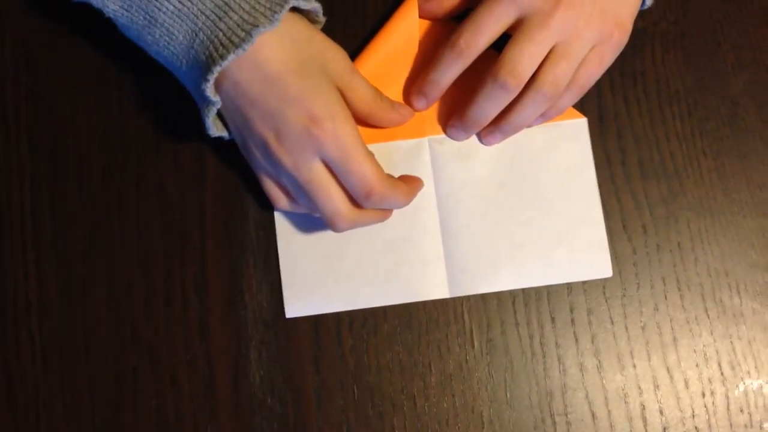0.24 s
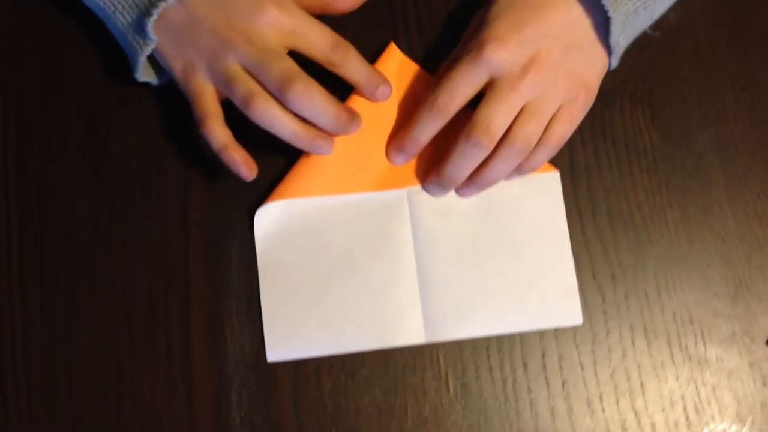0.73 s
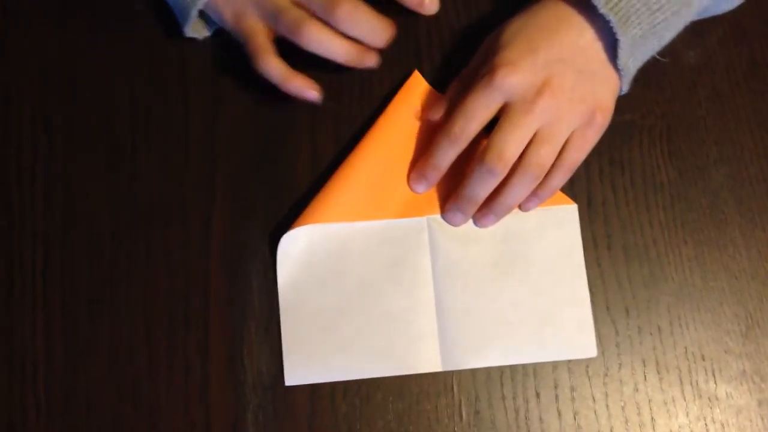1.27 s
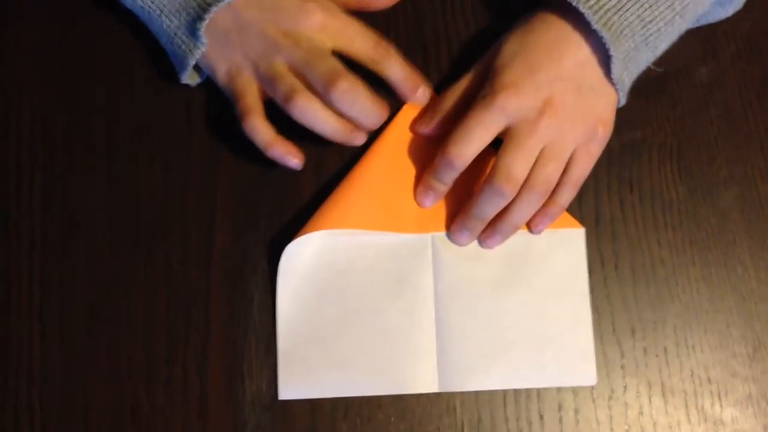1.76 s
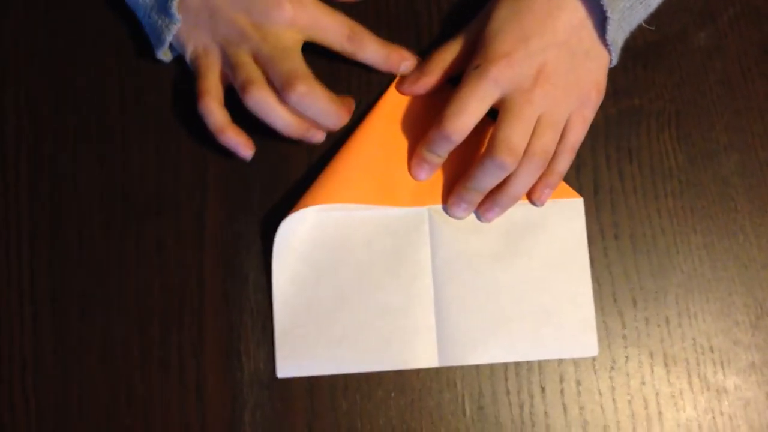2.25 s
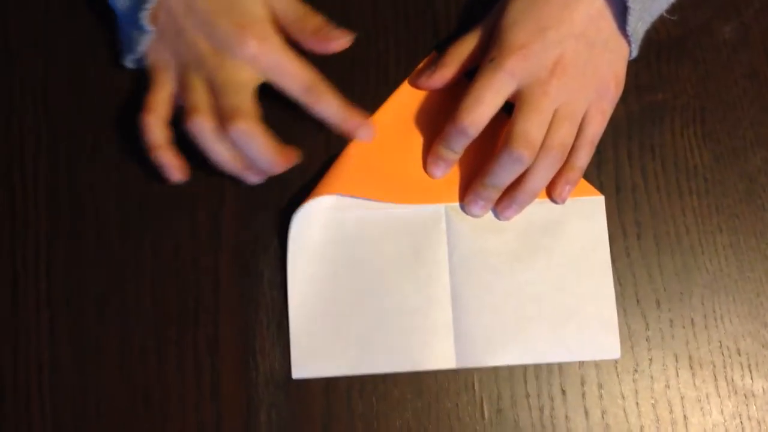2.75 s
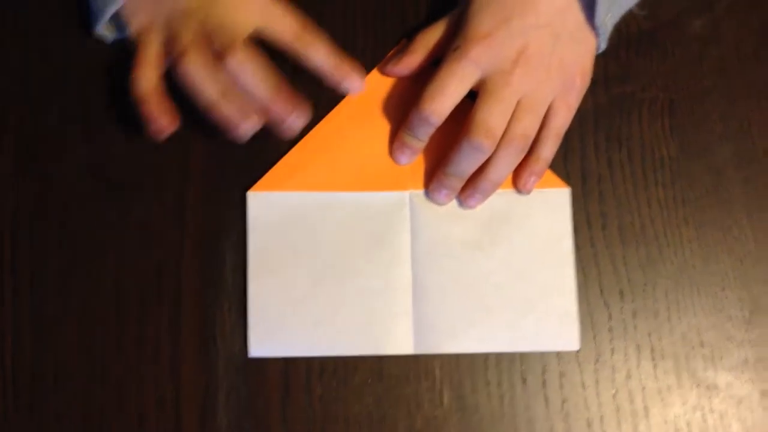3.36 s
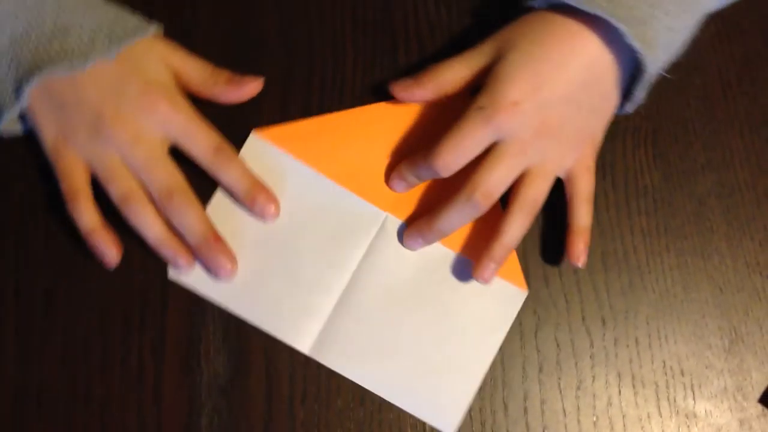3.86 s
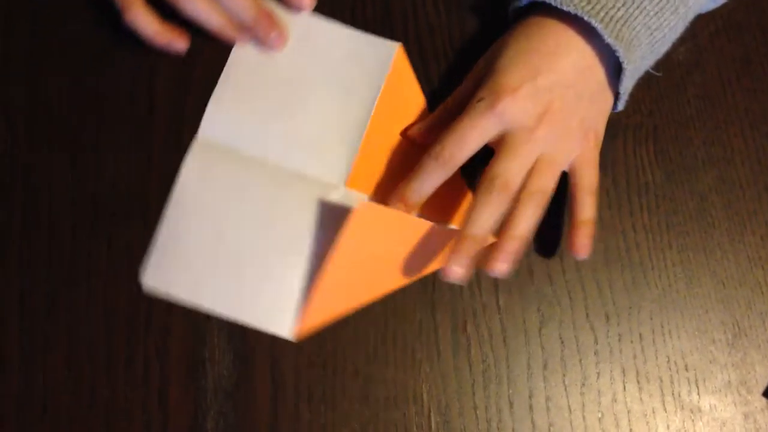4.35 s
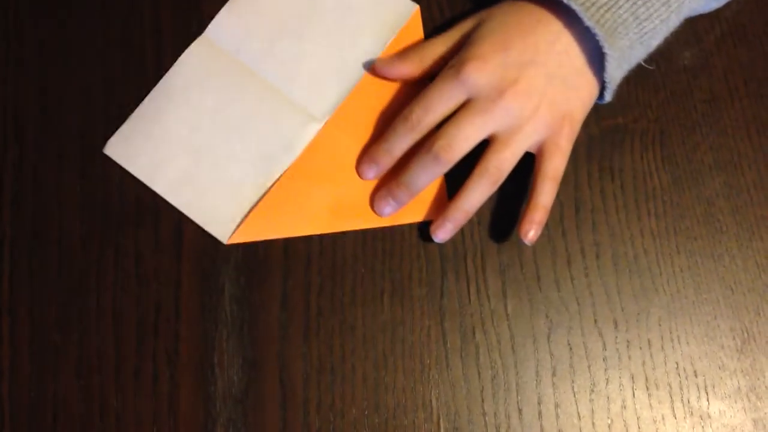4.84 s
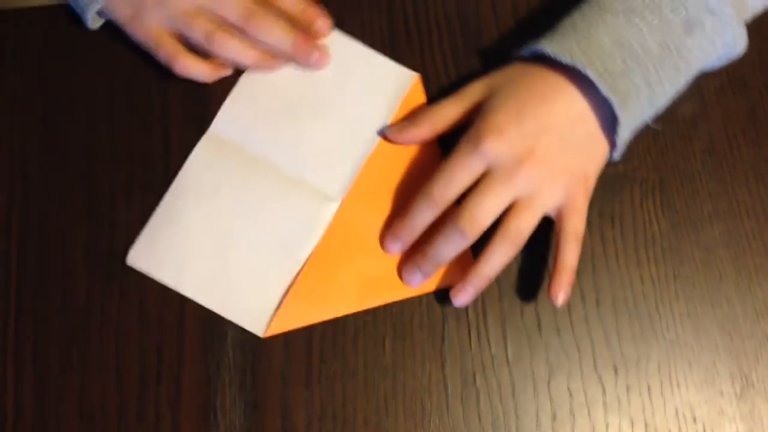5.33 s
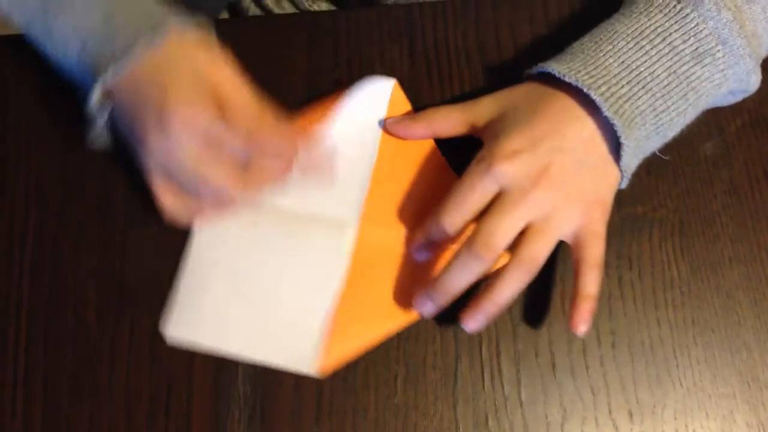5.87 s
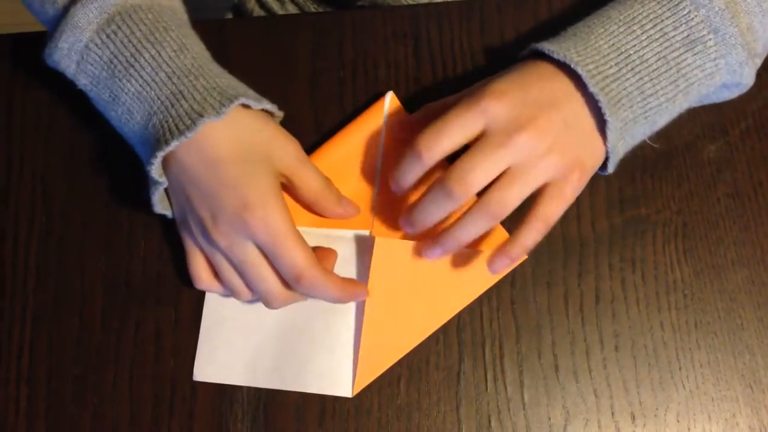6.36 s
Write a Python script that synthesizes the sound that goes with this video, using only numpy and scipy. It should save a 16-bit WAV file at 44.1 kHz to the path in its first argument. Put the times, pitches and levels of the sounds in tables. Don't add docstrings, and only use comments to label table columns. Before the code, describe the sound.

A quiet room with faint low hum and thin steady hiss; a sheet of paper is worked by hand on a wooden table, close to a small microphone. The first second holds only tiny ticks and barely audible rubbing. From 1.0 s small crackles gather into very sharp, bright snaps at about 1.16 and 1.23 s, with a short rustle. A dry click falls at 1.5 s, then near quiet. At 2.6-2.8 s a few crisp creases and a brief airy finger stroke, with a fainter one near 3.1 s. Around 3.9 s a hand lands softly with a dull low thump. From 4.0 to 4.7 s the sheet slides and buckles in the fullest rustle, dense with pops and hard cracks near 4.27 s. It calms; light touches at 5.4 s, a soft slide at 5.5 s, a moderate crinkle at 5.75-5.95 s, and faint taps from 6.2 to 6.55 s.

```python
import sys
import numpy as np
from scipy import signal
from scipy.fft import rfft, irfft, next_fast_len
from scipy.io import wavfile
from scipy.ndimage import uniform_filter1d, map_coordinates

SR = 44100
rng = np.random.default_rng(int(sys.argv[2]) if len(sys.argv) > 2 else 0)


def file_out(sig):
    cols = np.atleast_2d(sig).T
    lim = np.clip(cols, -1, 1)
    pcm = np.round(lim * 32767).astype(np.int16)
    wavfile.write(sys.argv[1], SR, pcm)


def ratio_of_db(decibels):
    return 10 ** (np.asarray(decibels, float) / 20)


N = 291060


def unit(x):
    return x / np.sqrt(np.mean(x ** 2) + 1e-20)


def along(points, hz):
    f, v = np.transpose(points)
    return np.interp(np.log(hz + 1), np.log(f + 1), v)


def wobble(rate):
    knots = rng.standard_normal(int(N * rate / SR) + 4)
    return map_coordinates(knots, [np.arange(N) * rate / SR])


def filtered(x, response):
    n = x.shape[-1]
    m = next_fast_len(n + 4096)
    spectrum = rfft(x, m) * response(np.fft.rfftfreq(m, 1 / SR))
    return irfft(spectrum, m)[..., :n]


def peak(f, hz, width_hz):
    return 1j * f * width_hz / (hz * hz - f * f + 1j * f * width_hz)


def body(modes):
    if len(modes) == 1:
        return lambda f: peak(f, *modes[0][:2]) ** 2
    return lambda f: np.sqrt(sum(ratio_of_db(2 * db) * np.abs(peak(f, hz, w)) ** 4 for hz, w, db in modes))


def patchy(depth_db):
    z = signal.stft(rng.standard_normal(N), nperseg=256)[2]
    field = uniform_filter1d(rng.standard_normal(z.shape), size=4, axis=0)
    field = uniform_filter1d(field, size=10, axis=1)
    return signal.istft(z * ratio_of_db(depth_db * unit(field)), nperseg=256)[1][:N]


# pitch_hz, level_db (per Hz)
HUM = [(15, -60), (25, -27), (57, -9), (100, -7), (145, -4), (210, -9), (260, -13.5)]
# pitch_hz, level_db (per Hz)
AIR = [(450, -15), (740, -20), (2300, -27), (2900, -21), (4500, -24.5), (15300, -24.5)]


def room_tone():
    tone = unit(filtered(patchy(depth_db=0.17), lambda hz: ratio_of_db(along(HUM + AIR, hz))))
    hum = filtered(tone, lambda hz: 1 / (1 + (hz / 500) ** 4))
    hiss = tone - hum
    return ratio_of_db(-65.5) * (hiss + hum * ratio_of_db(0.7 * wobble(6)))


# peak_s, rise_s, fall_s, level_db, centre_hz
STROKES = [(0.55, 0.34, 0.091, -66.5, 6500), (1.22, .06, .1, -51, 11000), (1.95, 0.91, 0.83, -74.5, 8000),
           (2.27, 0.39, 0.6, -75, 2200), (2.49, 0.13, 0.067, -57.5, 8000), (2.67, .07, 0.056, -51.5, 9500),
           (2.8, .03, 0.31, -54, 6900), (2.99, 0.23, 0.12, -55, 10300), (3.13, 0.15, 0.17, -59, 3500),
           (3.6, 0.59, 0.79, -63, 4300), (4.12, 0.35, .2, -56, 11000), (4.29, 0.11, .11, -41, 6800),
           (5.15, 0.053, 0.32, -57.5, 9800), (5.42, 0.023, 0.34, -59, 8000),
           (5.596, 0.12, 0.062, -54.5, 8000), (5.73, .07, .12, -60, 6500), (5.83, 0.14, 0.052, -46.5, 5340),
           (5.9, 0.11, 0.12, -51.5, 3650), (6.2, 1, 0.87, -65, 6200), (6.33, 0.064, 0.079, -63, 2600)]
# peak_s, rise_s, fall_s, level_db, centre_hz
SLIDES = [(0.76, .06, .04, -64, 4800), (0.93, .06, .14, -70, 5600), (1.03, .06, .05, -67, 7000),
          (1.1, .03, .08, -65, 4400), (1.17, .03, 0.17, -61, 5500), (1.26, .07, 0.08, -45.5, 5340),
          (1.5, 0.21, 0.17, -61.5, 3900), (1.69, 0.076, 0.14, -64, 2950), (2.83, .09, 0.055, -47.5, 3900),
          (2.92, 0.17, .2, -62, 5800), (3.82, 0.29, 0.16, -55.5, 6600), (4.0, .14, 0.48, -51, 7300),
          (4.101, .04, 0.16, -46.5, 4900), (4.189, 0.044, .15, -46, 2600), (4.44, 0.1, 0.16, -40, 5060),
          (4.61, 0.13, 0.045, -41, 4700), (4.684, 0.037, 0.13, -51, 6000), (4.81, 0.51, 0.063, -55, 6450),
          (4.9, 0.6, 0.16, -64, 7040), (5.15, .035, 0.22, -60.5, 7000), (5.24, 0.16, 0.13, -53.5, 6900),
          (5.54, 0.14, 0.11, -44, 7300), (5.92, 0.19, 0.18, -46, 3860), (6.55, 0.13, 0.039, -61, 3300)]
GROUP_HZ = [1705, 4400, 7300, 11900]
GROUP_DB = [5.6, 0.055, 0.083, .1]
REST_DB = [-83, -83, -102, -86]


def drive(group):
    s, rise, fall, db, hz = np.transpose(SLIDES + STROKES)[..., None]
    octave_loss_db = np.repeat([11.5, 3], [len(SLIDES), len(STROKES)])[:, None]
    span_db, bend = 25, 1.07
    t = np.arange(0, N / SR, 0.002)
    away = np.abs(t - s) / np.where(t < s, rise, fall)
    off_centre_db = octave_loss_db * np.log2(GROUP_HZ[group] / hz) ** 2
    level_db = db + GROUP_DB[group] - off_centre_db - span_db * away ** bend
    power = ratio_of_db(2 * REST_DB[group]) + ratio_of_db(2 * level_db).sum(axis=0)
    return np.interp(np.arange(N) / SR, t, np.sqrt(power))


# pitch_hz, width_hz, level_db
FLEX = [(1180, 5400, -18), (1690, 1300, -1), (2240, 2700, -0.5)]
# pitch_hz, width_hz, level_db
SHEET = [(3400, 1440, -5), (4400, 2200, 2), (5400, 1740, -4.5)]
# pitch_hz, width_hz, level_db
FIBRE = [(6500, 4700, 2.8), (8000, 3040, 4.5)]
# pitch_hz, width_hz, level_db
HISS = [(10900, 7200, 0.92), (12600, 3800, -9.5)]


def rubbing():
    slips = ratio_of_db(1.24 * wobble(700) + 0.53 * wobble(120) + 1.26 * wobble(30))
    out = np.zeros(N)
    for group, modes in enumerate((FLEX, SHEET, FIBRE, HISS)):
        grains = slips * patchy(depth_db=1.8)
        out += drive(group) * unit(filtered(grains, body(modes)))
    return out


# pitch_hz, t60_s
WALLS = [(300, 0.86), (3000, 0.18), (12000, 0.026)]


def walls(x):
    hz, t, z = signal.stft(rng.standard_normal(SR // 2), SR, nperseg=256)
    fall = ratio_of_db(-60 * t / along(WALLS, hz)[:, None])
    tail = signal.istft(z * fall, SR, nperseg=256)[1]
    return signal.fftconvolve(np.pad(x, (200, 0)), tail / np.linalg.norm(tail))[:N]


# pitch_hz, width_hz, level_db
CRACK = [(3200, 1600, 6), (5400, 2000, 3), (8630, 5800, 3), (13020, 5000, -5)]


def snaps(buckles):
    out, t = np.zeros(N + SR), np.arange(SR // 20) / SR
    for s, db, hz, flex_db, crack_db, ms in buckles:
        fall = ratio_of_db(-9 * t / (0.00062 * np.clip(ms, 0.2, 6))) + 0.082 * ratio_of_db(-60 * t / 0.032)
        rise = 1 - np.exp(-t / (0.00008 * (1 + ms)))
        jolt = np.sign(rng.standard_normal((3, len(t)))) * fall * rise
        jolt = np.roll(jolt, SR // 500, axis=1)
        tone = unit(filtered(jolt[0], body([(hz, 0.36 * hz, 0)])))
        crack = unit(filtered(jolt[1], lambda f: body(CRACK)(f) * f ** 2 / (f ** 2 + 1800 ** 2)))
        flex = unit(filtered(jolt[2], body([(1647, 1230, 0)])))
        snap = tone + ratio_of_db(crack_db) * crack + ratio_of_db(flex_db) * flex
        out[round((s - 0.0023) * SR):][:len(t)] += ratio_of_db(db) * snap / np.abs(snap).max()
    return out[:N]


# start_s, peak_db, flex_db (re tone), length_ms
CREASES = [(0.515, -50.5, -4, 6), (0.6512, -50.5, 1, 2.1), (0.9038, -56, -17, 4), (1.0132, -38, -27, 0.9),
           (1.035, -35.5, -18, 2.1), (1.2236, -23.5, -3, 2.5), (1.2277, -12.5, -30, 1),
           (1.49, -30.5, -6, 0.35), (1.86, -42, 2, 0.32), (1.925, -48, 5, 0.4), (2.337, -42.5, 12, 2.2),
           (2.6172, -24, -0.5, 0.38), (2.6755, -18.5, -5.5, 0.26), (2.77, -22, -8.5, 0.93),
           (2.773, -43, 15, 2.4), (2.789, -30, -2, 1.8), (3.0924, -32, -13, 2.7), (3.9147, -38, 2, 0.37),
           (4.052, -34, -5, 0.75), (4.2566, -11, 6, 0.96), (4.6212, -31, 4, 2.8), (5.8763, -31.5, 5, 0.96),
           (5.9048, -38, -3, 0.65), (6.186, -47.5, -3, 5.8)]


def creases():
    return snaps([(s, db, 3300, flex_db, 8, ms) for s, db, flex_db, ms in CREASES])


# start_s, peak_db, pitch_hz, length_ms
POPS = [(0.547, -38, 3110, 3.3), (0.7371, -42, 3080, 0.57), (1.6382, -52, 5200, 1), (3.662, -45, 6400, 2.4),
        (3.8869, -38.5, 3500, 0.41), (4.092, -27, 4550, 2.7), (4.1736, -22, 3870, 0.48),
        (4.1823, -24, 4140, 0.3), (4.251, -25.5, 4450, 4.7), (4.3021, -23.5, 3050, 6),
        (4.511, -28.5, 3030, 4.4), (5.7605, -37, 4300, 2.2), (6.3084, -32.5, 3030, 1),
        (6.3355, -41, 3820, 0.6), (6.5283, -29.5, 4600, 3.3)]


def pops():
    return snaps([(s, db, hz, -5, -9.5, ms) for s, db, hz, ms in POPS])


# start_s, level_db, centre_hz, t60_s
RUSTLES = [(0.736, -58, 5000, 0.23), (0.903, -64, 5000, 0.1), (1.011, -69, 6900, 0.34),
           (1.032, -44, 4240, 0.095), (1.087, -42.5, 4670, 0.049), (1.129, -56, 7000, 0.28),
           (1.158, -44.5, 4700, 0.3), (1.2206, -31, 4500, 0.036), (1.2311, -38.5, 6500, 0.22),
           (1.48, -61.5, 7500, 0.4), (1.499, -60, 3550, 0.11), (1.669, -61, 3080, 0.1),
           (1.86, -62.5, 4620, 0.33), (2.615, -52, 5300, 0.27), (2.674, -59, 5060, 0.24),
           (2.702, -47, 3460, 0.12), (2.769, -51, 5170, 0.3), (3.09, -72, 4140, 0.67),
           (4.168, -35, 3400, 0.33), (4.256, -31, 3700, 0.44), (4.291, -27, 3940, 0.06),
           (4.367, -35, 5540, 0.18), (4.607, -35, 5560, 0.072), (5.396, -61, 6900, 0.3),
           (5.8, -40.5, 5400, 0.5), (5.828, -34, 5000, 0.11), (5.863, -34, 4170, 0.1),
           (5.903, -44, 3800, 0.24), (6.302, -54, 4030, 0.37), (6.527, -53, 4300, 0.15)]


def rustles():
    out, t = np.zeros(N + SR), np.arange(SR // 3) / SR
    for s, db, hz, t60 in RUSTLES:
        noise, grit = rng.standard_normal((2, len(t)))
        lumps = ratio_of_db(3.2 * unit(uniform_filter1d(grit, size=60)))
        crackle = unit(filtered(noise * lumps, lambda f: peak(f, hz, 0.66 * hz) * body(CRACK)(f)))
        swell = ratio_of_db(db - 60 * t / np.clip(t60, 0.02, 0.6)) * (1 - np.exp(-t / 0.0046))
        out[round(s * SR):][:len(t)] += swell * crackle
    return out[:N]


# start_s, peak_db, pitch_hz, length_ms
TICKS = [(0.9272, -51, 4800, 5.1), (0.9842, -50, 4160, 3.6), (1.023, -36, 4050, 1.2),
         (1.029, -36.5, 9000, 1.1), (1.0386, -38, 4180, 0.5), (1.088, -33, 3200, 0.39),
         (1.1, -42, 3800, 1.2), (1.13, -43, 3500, 4.4), (1.1577, -13, 4180, 0.46),
         (1.229, -8.5, 7270, 0.32), (1.231, -21, 4400, 0.9), (1.4606, -47, 3400, 0.94),
         (1.48, -35.5, 3740, 2.1), (1.4993, -25.5, 3590, 1.8), (2.7006, -25.5, 4300, 1.6),
         (3.9185, -35, 6800, 3.3), (4.283, -13, 7300, 2.1), (4.367, -32, 3300, 0.6), (4.3725, -21, 3700, 2),
         (5.599, -39, 7600, 2.1), (5.8004, -36, 4050, 3.1), (6.551, -38, 5240, 1)]


def ticks():
    return snaps([(s, db, hz, -22.5, -4.5, ms) for s, db, hz, ms in TICKS])


# start_s, peak_db, pitch_hz, length_ms
TAPS = [
    (1.0445, -37, 3630, 1),
    (1.6682, -32, 3400, 2.6),
    (4.2889, -13, 3620, 4.5),
    (4.6095, -29, 4540, 0.6),
    (6.2517, -42.5, 3030, 2),
    (6.3043, -33.5, 3140, 1.9),
    (6.331, -37, 3400, 1.1),
]


def taps():
    return snaps([(s, db, hz, -15, -15.5, ms) for s, db, hz, ms in TAPS])


# start_s, length_s, level_db, pitch_hz, width_hz
SCRAPES = [(1.202, 0.082, -66, 150, 200), (1.667, 0.042, -65.5, 350, 500), (1.668, 0.01, -54, 1040, 500),
           (2.331, 0.025, -61, 590, 430), (2.928, 0.074, -61, 850, 658.8), (3.085, 0.026, -59, 1660, 166.7),
           (3.11, 0.056, -57.5, 1680, 378), (3.117, 0.1, -65, 2460, 490), (3.55, 0.32, -67, 1210, 905),
           (4.198, 0.22, -68, 208, 200), (4.498, 0.034, -59.5, 635, 480), (4.609, .031, -65, 700, 500),
           (5.575, 0.037, -66, 570, 343), (5.744, .035, -57, 1750, 360), (5.76, 0.17, -63.5, 100, 161),
           (5.777, 0.098, -61, 630, 220), (6.297, 0.047, -66.5, 600, 463)]


def scrapes():
    out, t = np.zeros(N + SR), np.arange(SR // 3) / SR
    for s, length, db, hz, width_hz in SCRAPES:
        drag = unit(filtered(rng.standard_normal(len(t)), body([(hz, width_hz, 0)])))
        out[round(s * SR):][:len(t)] += ratio_of_db(db) * np.sin(np.pi * np.clip(t / length, 0, 1)) * drag
    return out[:N]


# start_s, peak_db, pitch_hz, t60_s
THUMPS = [
    (3.918, -46.5, 114, 0.069),
    (5.41, -53.5, 109, 0.089),
    (5.458, -56.5, 133, 0.096),
]


def thumps():
    out, t = np.zeros(N + SR), np.arange(SR // 4) / SR
    for s, db, hz, t60 in THUMPS:
        swell = ratio_of_db(db + 7 - 60 * t / t60) * (1 - np.exp(-t / 0.0031))
        out[round(s * SR):][:len(t)] += swell * np.sin(2 * np.pi * hz * t)
    return out[:N]


def scene():
    paper = ticks() + pops() + taps() + creases() + rustles() + scrapes() + rubbing()
    return (paper + ratio_of_db(-12.5) * walls(paper) + thumps() + room_tone())[None]


def top_cut(x):
    return signal.sosfilt(signal.butter(12, 16500, fs=SR, output="sos"), x)


def record(dry):
    mix = filtered(dry, lambda hz: np.where(hz < 15350, 1, ratio_of_db(-35)))
    return top_cut(mix)


dry = scene()
out = record(dry)
file_out(out)
```